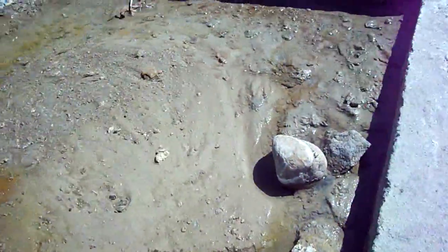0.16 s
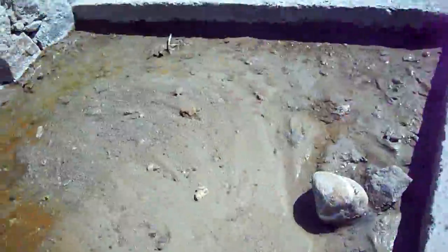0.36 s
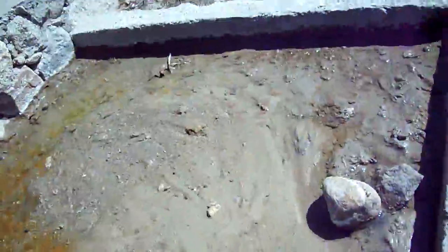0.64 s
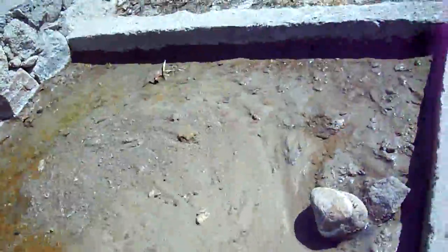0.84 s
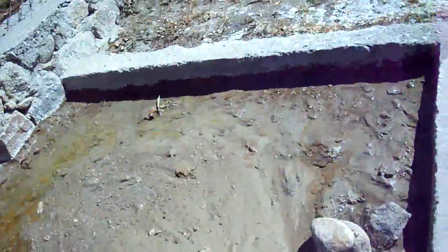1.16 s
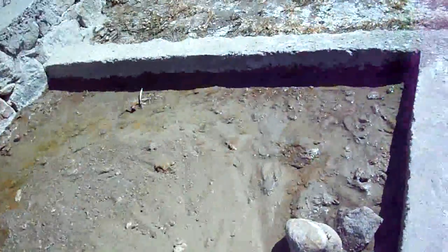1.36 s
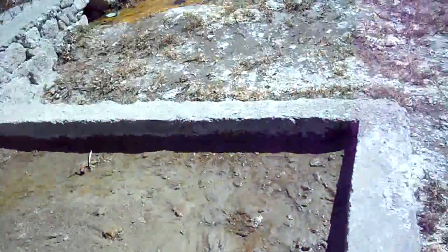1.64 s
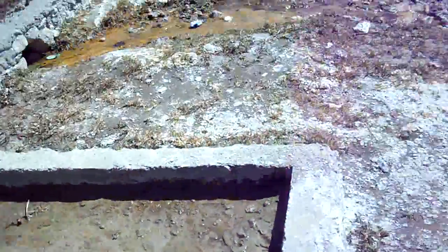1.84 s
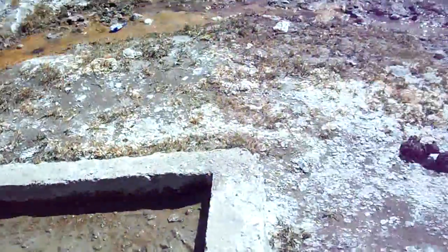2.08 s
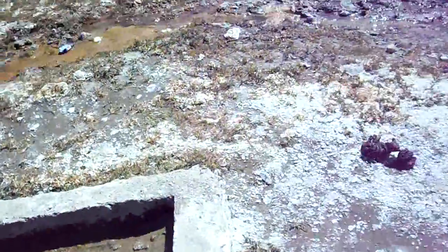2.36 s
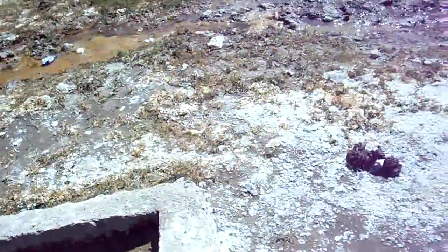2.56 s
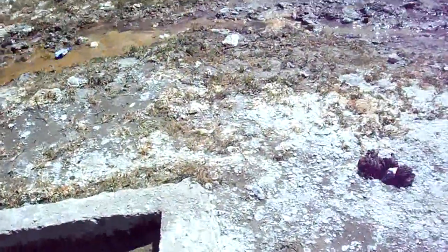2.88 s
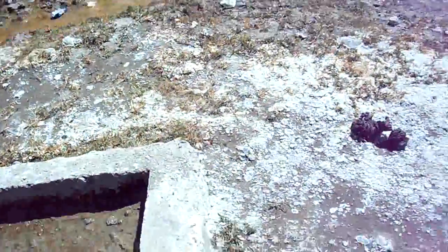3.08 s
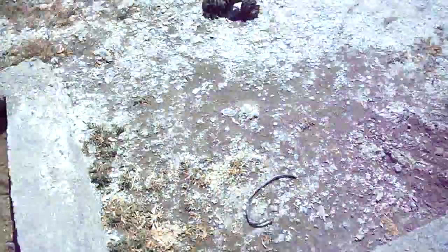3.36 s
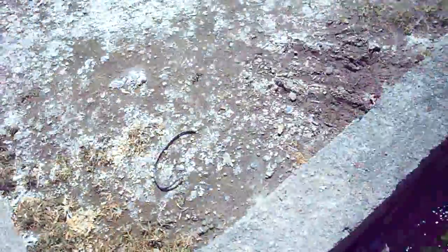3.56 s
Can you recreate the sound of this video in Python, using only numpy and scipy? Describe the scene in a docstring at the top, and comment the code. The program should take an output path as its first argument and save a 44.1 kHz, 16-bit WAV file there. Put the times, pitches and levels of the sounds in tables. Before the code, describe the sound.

Shallow water flows and splashes steadily outdoors, with wind gusts rumbling on the microphone.

```python
"""A steady wash of shallow water in an outdoor channel, with sharp splashes close by, low gurgles
and gusts of wind on one small camera microphone. The wash and its fizz are patchy noise plus swarms
of tiny bubbles, each a damped, rising sine. Gurgles are single, longer-ringing bubbles; a splash is
a short ring inside a burst of spray. Wind turbulence gives rumble, eddies and brief slaps."""
import sys
import numpy as np
from scipy import signal
from scipy.fft import rfft, irfft, next_fast_len
from scipy.io import wavfile
from scipy.ndimage import uniform_filter1d, map_coordinates

SR = 44100
rng = np.random.default_rng(int(sys.argv[2]) if len(sys.argv) > 2 else 0)


def to_wav(s):
    """Save 16-bit WAV."""
    ch = np.atleast_2d(s).T  # columns
    pcm = np.round(np.clip(ch, -1, 1) * 32767)  # PCM
    wavfile.write(sys.argv[1], SR, pcm.astype(np.int16))


N = 164052
TOP_HZ = 10400

# Table levels are relative; each source adds its own gain.
# gust strength: time_s, level_db
GUST_LEVEL = [(0, -41), (.03, -19), (.1, -22.5), (.16, -36), (.23, -33), (.36, -48), (.43, -26), (.53, -51),
              (.8, -42.5), (.86, -24), (.91, -32), (.97, -25.5), (1.04, -46), (1.12, -31), (1.3, -41),
              (1.58, -42.5), (1.66, -25.5), (1.72, -35), (1.86, -32.5), (1.91, -17), (1.97, -26),
              (2.04, -19), (2.14, -27.5), (2.17, -23), (2.27, -27.5), (2.39, -28), (2.52, -32.5),
              (2.6, -27), (2.755, -28.5), (2.79, -16), (2.815, -34), (2.845, -18), (2.89, -30), (2.96, -33),
              (3.05, -27.5), (3.15, -31), (3.21, -19), (3.27, -21), (3.35, -25.5), (3.39, -21.5),
              (3.45, -29.5), (3.52, -28), (3.6, -32), (3.72, -39)]
# hardest buffets: centre_s, level_db
SLAP_EVENTS = [(.04, -30.5), (0.097, -26), (2.048, -19.5), (2.791, -27.5), (2.846, -27.5), (3.206, -19),
               (3.264, -23), (3.391, -25)]
# wind spectra: freq_hz, gain_db
RUMBLE_SPECTRUM = [(10, 0.5), (25, -2.5), (42, 1.5), (75, -13), (140, -24), (250, -35.5), (600, -43),
                   (2000, -76)]
EDDY_SPECTRUM = [(25, -22.5), (55, 2.5), (95, 0.5), (135, -7.5), (200, -20), (330, -31.5), (700, -44),
                 (2500, -70)]
SLAP_SPECTRUM = [(50, -12), (140, 4.5), (300, -23.5), (1500, -52)]
# water envelopes: time_s, level_db
WASH_ENVELOPE = [(0.0, -43), (0.69, -42), (0.83, -41.5), (1.05, -42), (1.38, -45), (1.86, -42.5),
                 (2.28, -44), (2.92, -44), (3.22, -42.5), (3.72, -43)]
FIZZ_ENVELOPE = [(0.0, -46.5), (0.63, -48), (1.57, -48), (1.94, -48.5), (2.19, -51.5), (2.44, -49),
                 (2.69, -48), (3.18, -51.5), (3.35, -49.5), (3.57, -47.5), (3.72, -49)]
SPRAY_ENVELOPE = [(0, -56.5), (.55, -48.5), (.85, -54), (1.25, -58), (1.5, -77), (3.3, -62), (3.5, -50),
                  (3.72, -48.5)]
# water spectra: freq_hz, gain_db
WASH_SPECTRUM = [(80, -8), (220, 7.5), (340, 3.5), (460, -0.5), (650, 4), (1000, -1), (1600, -1.5),
                 (2600, -6), (4000, -23), (7000, -19), (10000, -51.5)]
FIZZ_SPECTRUM = [(500, -38), (1800, -5), (3200, -0.5), (4600, 1), (5800, -5.5), (7000, -5), (8000, -7),
                 (10000, -10)]
# single bubbles: start_s, level_db, pitch_hz, t60_s
GURGLE_EVENTS = [(.457, -25.5, 380, 0.031), (0.477, -31, 580, 0.052), (0.489, -27.5, 302, 0.07),
                 (.507, -28, 552, 0.073), (.586, -27.5, 650, 0.057), (.682, -27, 568, 0.049),
                 (.75, -23, 250, 0.051), (.946, -34, 338, 0.096), (1.505, -34.5, 883, .038),
                 (2.401, -33, 367, 0.08), (3.033, -29.5, 1430, 0.02), (3.046, -25.5, 1730, 0.019),
                 (3.251, -30, 1700, 0.022), (3.272, -24, 1790, 0.02), (3.39, -29, 656, 0.034),
                 (3.459, -30, 1710, 0.028), (3.562, -24, 1086, 0.022), (3.662, -28, 1490, 0.027),
                 (3.677, -31, 1760, 0.046), (3.701, -28, 1500, .025)]
# near splashes: start_s, level_db, pitch_hz, t60_s
SPLASH_EVENTS = [(0.1837, -16, 3230, 0.0011), (.213, -27.5, 4180, 0.01), (0.2508, -22.5, 4700, 0.0063),
                 (.3032, -19, 3700, 0.0019), (.307, -28.5, 3400, 0.0047), (.3836, -24, 2100, 0.0011),
                 (0.4377, -23.5, 3300, .0044), (0.4989, -20.5, 2230, 0.0019), (.515, -23, 5360, 0.0043),
                 (.5318, -23.5, 1200, 0.013), (0.555, -31, 3450, 0.002), (0.572, -24.5, 4960, 0.007),
                 (.6028, -23, 1250, 0.04), (.6023, -23.5, 2060, 0.016), (.624, -24, 1400, 0.017),
                 (.6238, -30.5, 4830, 0.0057), (0.63, -24.5, 6640, 0.0071), (.652, -16, 7230, 0.0045),
                 (.711, -24, 5330, 0.0068), (0.7211, -25, 4430, .005), (0.721, -22.5, 1670, 0.022),
                 (0.7955, -17.5, 2720, 0.005), (1.055, -24.5, 3940, 0.012), (1.0914, -23.5, 2730, 0.0021),
                 (1.104, -27, 4770, .006), (1.122, -26, 3900, 0.0089), (1.1309, -16, 3600, 0.0032),
                 (1.182, -26, 1510, 0.012), (1.1834, -26.5, 3660, 0.0038), (1.1905, -27, 4180, 0.017),
                 (1.2857, -28, 4340, 0.006), (1.2886, -16, 5000, 0.0012), (1.5913, -28.5, 3800, 0.0065),
                 (1.596, -24.5, 2540, .015), (1.6525, -27, 2230, 0.022), (1.7236, -24.5, 5280, 0.0029),
                 (1.767, -18.5, 3230, 0.018), (1.7702, -29, 4370, 0.015), (1.8008, -23, 4300, 0.0076),
                 (1.8543, -25.5, 3520, 0.0073), (1.8889, -26.5, 2620, 0.014), (2.1385, -25, 2830, 0.016),
                 (2.58, -20.5, 2020, 0.0035), (2.884, -23, 4020, 0.0078), (2.957, -25.5, 3570, 0.0035),
                 (3.1028, -26.5, 3340, 0.0027), (3.149, -31, 4530, 0.02)]
# microphone response: freq_hz, gain_db
MIC_RESPONSE = [(20, 0.5), (7100, 0), (7900, -5.5), (8600, -7), (9300, -14.5), (10000, -30.5),
                (10600, -40.5)]


def amp(db):
    """Decibels to gain."""
    return 10 ** (np.asarray(db) / 20)


def unit(x):
    """Scale to rms 1."""
    return x / np.sqrt(np.mean(x ** 2) + 1e-20)


def curve(rows):
    """One value per sample from (time_s, value) rows."""
    return np.interp(np.arange(N) / SR, *np.transpose(rows))


def wobble(rate_hz):
    """Smooth random curve, rate_hz knots a second."""
    return map_coordinates(rng.standard_normal(4096), [np.arange(N) * rate_hz / SR + 2], mode="wrap")


def swell(centre_s, width_s):
    """Gaussian rise and fall."""
    return np.exp(-.5 * ((np.arange(N) / SR - centre_s) / width_s) ** 2)


def add(out, start_s, x):
    """Mix x into out."""
    i = max(0, round(start_s * SR))
    out[i:i + len(x)] += x[:max(0, N - i)]


def coloured(x, spectrum):
    """Filter by (freq_hz, gain_db) rows; cut at TOP_HZ."""
    size = next_fast_len(N + 8192)
    hz = np.fft.rfftfreq(size, 1 / SR)
    knot_hz, knot_db = np.transpose(spectrum)
    gain = amp(np.interp(np.log(hz + 1), np.log(knot_hz + 1), knot_db))
    return irfft(rfft(x, size) * gain * (hz < TOP_HZ), size)[:N]


def turbulence(spectrum):
    """Shaped noise, rms held near 1 over 80 ms."""
    x = coloured(rng.standard_normal(N), spectrum)
    return x / np.sqrt(np.abs(uniform_filter1d(x * x, size=3500)) + 1e-12)


def wind():
    """Gusts drive a deep rumble and, more steeply, smaller eddies; hard buffets slap the microphone."""
    ref_db = -28
    gust_db = curve(GUST_LEVEL) - ref_db
    flutter_db = 1.5 * wobble(rate_hz=40)
    rumble = amp(0.46 * gust_db + flutter_db - 2) * turbulence(RUMBLE_SPECTRUM)
    eddies = amp(1.41 * gust_db + flutter_db - 5) * turbulence(EDDY_SPECTRUM)
    slap_gain = sum(amp(db) * swell(centre_s, width_s=0.014) for centre_s, db in SLAP_EVENTS)
    return amp(ref_db) * (rumble + eddies) + slap_gain * turbulence(SLAP_SPECTRUM)


def bubbles(count, pitch_hz, spread_oct, t60_cycles, spread_db, rise, samples):
    """Swarm of damped sines, many faint, a few strong; rms 1. rise: fractional pitch gain per t60."""
    when, loudness, length = rng.random((count, 3)).T[:, :, None]
    hz = np.clip(pitch_hz * 2 ** (spread_oct * rng.standard_normal((count, 1))), 200, 9500)
    strength = amp(spread_db * np.minimum(-np.log(loudness + 1e-9), 2.8))
    cycles = hz * np.arange(samples) / SR
    age = cycles / (t60_cycles * (.5 + length))  # 1 at -60 dB
    envelope = strength * amp(-60 * age) * (1 - np.exp(-2 * cycles))
    rings = envelope * np.sin(2 * np.pi * cycles * (1 + rise * np.minimum(age, 2) / 2))
    index = (when * N).astype(int) + np.arange(samples)
    return unit(np.bincount(index.ravel(), rings.ravel(), N + samples)[:N])


def churn():
    """Short surge of mid-sized bubbles around the first gurgles."""
    swarm = bubbles(1200, 850, spread_oct=0.92, t60_cycles=16, spread_db=2.5, rise=0.047, samples=2000)
    return amp(-46) * swell(centre_s=0.52, width_s=0.15) * swarm


def spatter():
    """High ticks of fine spray that come and go; one brief, dense rasp."""
    ticks = bubbles(1800, 7620, spread_oct=0.21, t60_cycles=36, spread_db=19.5, rise=.1, samples=200)
    rasp = bubbles(5000, 4080, spread_oct=0.35, t60_cycles=34, spread_db=5, rise=.1, samples=200)
    return amp(curve(SPRAY_ENVELOPE)) * ticks + amp(-41.5) * swell(centre_s=2.04, width_s=.04) * rasp


def gurgles():
    """Single bubbles ring and rise slightly in pitch; two fainter ones break off each."""
    attack_s, rise_per_s = 0.0031, 0.16
    out, t = np.zeros(N), np.arange(SR // 8) / SR
    for start_s, level_db, pitch_hz, t60_s in GURGLE_EVENTS:
        envelope = amp(level_db + 2.5 - 60 * t / t60_s) * (1 - np.exp(-t / attack_s))
        phase = 2 * np.pi * pitch_hz * t * (1 + rise_per_s * t / 2)
        add(out, start_s, envelope * np.sin(phase))
        for late, small in rng.random(size=(2, 2)):
            add(out, start_s + late * t60_s / 2, amp(-9) * envelope * np.sin(phase * 2 ** (small - .5)))
    return out


def drop(pitch_hz, t60_s):
    """One drop: a short ring inside spray of like pitch. Longer ring, less spray."""
    attack_s, spray_width_oct = .00018, 0.95
    t = np.arange(2048) / SR
    envelope = (1 - np.exp(-t / attack_s)) ** 2 * amp(-60 * t / t60_s)
    ring = envelope / envelope.max() * np.sin(2 * np.pi * pitch_hz * t)
    offset_oct = np.log2((np.fft.rfftfreq(len(t), 1 / SR) + 1) / pitch_hz)
    noise = irfft(rfft(rng.standard_normal(len(t))) / (1 + (offset_oct / spray_width_oct) ** 4))
    spray_rms = amp(2.5) / (1 + t60_s / 0.014) * ring.std()
    return ring + spray_rms * unit(envelope * noise)


def splashes():
    """Each near splash throws up three fainter droplets that land just after it."""
    max_delay_s = .009
    out = np.zeros(N)
    for start_s, level_db, pitch_hz, t60_s in SPLASH_EVENTS:
        gain = amp(level_db - 2)
        add(out, start_s, gain * drop(pitch_hz, t60_s))
        for late, small in rng.random(size=(3, 2)):
            droplet = amp(-17.5 * (0.5 + late / 2)) * drop(pitch_hz * 2 ** (small - .5), t60_s)
            add(out, start_s + late * max_delay_s, gain * droplet)
    return out


def rush(spectrum, patchy_db=3.5):
    """Shaped noise with random gain patches in time and frequency; rms 1."""
    bins = signal.stft(rng.standard_normal(N), nperseg=256)[2]
    patches = uniform_filter1d(rng.standard_normal(bins.shape), size=5, axis=0)
    patches = uniform_filter1d(patches, size=5, axis=1)
    noise = signal.istft(bins * amp(patchy_db * unit(patches)), nperseg=256)[1][:N]
    return unit(coloured(noise, spectrum))


def stream():
    """Running water: wash with babbling bubbles, flickering fizz with crackling spray."""
    wash = rush(WASH_SPECTRUM)
    babble = bubbles(1300, 1440, spread_oct=0.886, t60_cycles=11, spread_db=6, rise=0.054, samples=1300)
    fizz = rush(FIZZ_SPECTRUM)
    crackle = bubbles(3200, 3910, spread_oct=0.47, t60_cycles=10.5, spread_db=14, rise=0.093, samples=300)
    body = amp(-0.5) * wash + amp(-7) * babble
    treble = amp(-0.17) * fizz + amp(0.8) * crackle
    flicker_db = wobble(rate_hz=30.6)
    return amp(curve(WASH_ENVELOPE)) * body + amp(curve(FIZZ_ENVELOPE) + flicker_db) * treble


def scene():
    """Water and wind, mono."""
    return (stream() + splashes() + gurgles() + churn() + spatter() + wind())[None]


def record(dry):
    """Camera microphone: treble roll-off and band limit."""
    return coloured(dry[0], MIC_RESPONSE)[None]


dry = scene()
out = record(dry)
to_wav(out)
```